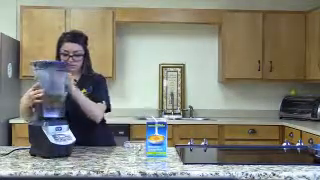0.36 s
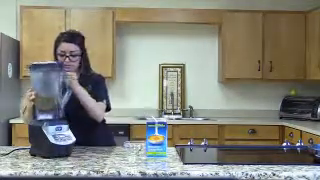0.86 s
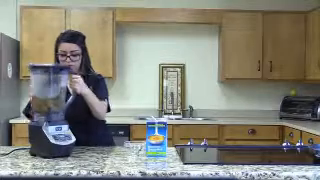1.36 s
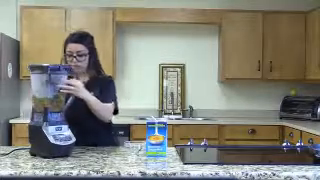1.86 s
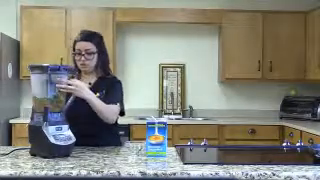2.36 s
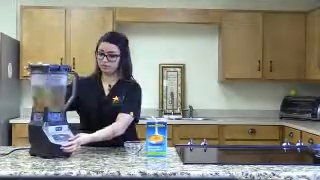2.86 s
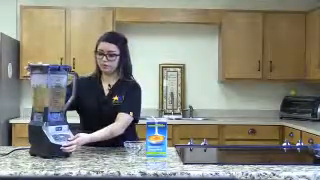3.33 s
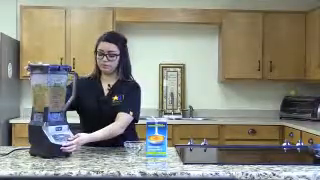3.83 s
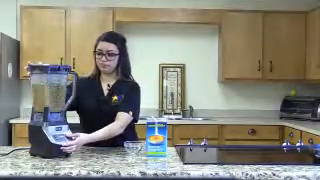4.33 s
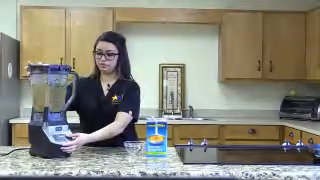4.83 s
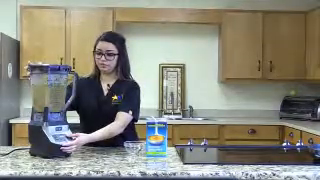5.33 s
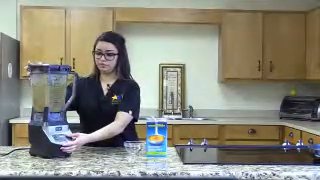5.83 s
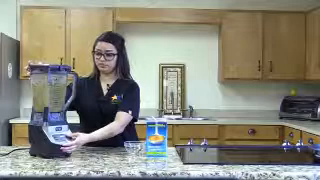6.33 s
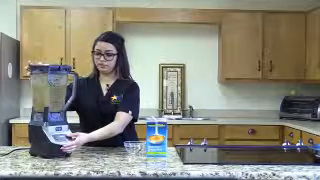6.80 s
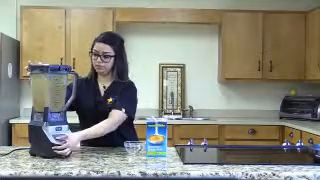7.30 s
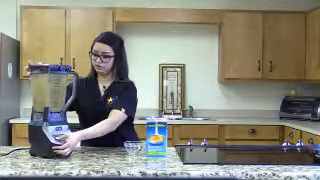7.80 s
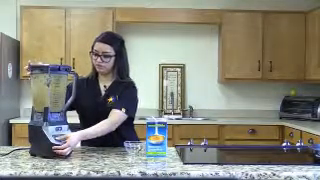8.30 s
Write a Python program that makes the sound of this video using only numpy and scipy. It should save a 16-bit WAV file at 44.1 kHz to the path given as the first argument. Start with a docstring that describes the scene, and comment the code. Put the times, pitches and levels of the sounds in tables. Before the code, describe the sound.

Plastic jar thumps and twists into place, a switch clicks, and a blender roars with a rising whine, briefly cuts out, then winds down.

```python
"""Blender in a quiet kitchen

One microphone, near enough that the room's echo stays well under the direct sound. A blender jar
is knocked, slid and twisted onto its base: damped blows, ringing modes, cracks and friction noise.
A switch clicks and a geared motor spins up, whines over the churning load (tones locked to shaft
speed over shaped noise) and coasts down. The sound drops out twice for a moment, and after the
second gap the motor runs faster."""
import sys
import numpy as np
from scipy import signal
from scipy.fft import rfft, irfft
from scipy.io import wavfile
from scipy.ndimage import uniform_filter1d

SR = 44100
rng = np.random.default_rng(int(sys.argv[2]) if len(sys.argv) > 2 else 0)


def boost(x):
    """Linear amplitude factor 10**(x/20) for a level x in decibels (scalar or array-like)."""
    u = np.asarray(x, float) / 20
    return 10 ** u


def store_wav(level_fs):
    """Save 16-bit WAV to argv[1]."""
    pcm = np.round(np.clip(np.atleast_2d(level_fs), -1, 1) * 32767)
    wavfile.write(sys.argv[1], SR, pcm.T.astype(np.int16))


N = 382193

# Steady air and rumble of the room: pitch_hz, relative level_db per Hz
FLOOR = [(20, -26), (40, -11), (65, -0.5), (85, -9.5), (105, -15), (150, -8.5), (190, -20), (700, -25.5),
         (1000, -30.5), (5000, -40.5), (16000, -47)]
# Faint low hum: time_s, pitch_hz, relative level_db
HUM = [(0, 135, -61), (.28, 139.6, -57), (.36, 142, -72.5), (2.55, 152, -79)]
# Echo of the kitchen: pitch_hz, t60_s
KITCHEN = [(120, 0.45), (400, 0.42), (1000, 0.5), (2300, 0.55), (6060, 0.36)]
# Hands and jar sliding: start_s, bend_s, end_s, start_db, bend_db
RUBS = [(0.332, 0.73, .93, -74, -57.5), (1.847, 1.87, 2.2, -66, -67), (2.181, 2.298, 2.42, -68, -67)]
# Modes of jar and base: pitch_hz, relative level_db, t60_s
JAR_MODES = [(250, -10.5, 0.037), (341, -3, 0.067), (500, 2, 0.037), (692, -5.5, .06), (800, -21.5, .06),
             (990, -9.5, 0.077), (1150, -13, .05), (1600, -17.5, .04), (2080, -21, .05), (2780, -29, .04)]
# Parts of blows on jar, lid and switch; a hard blow takes several rows, including a reflection:
# start_s, blow_db, blow pitch_hz, relative crack_db, relative thud_db
KNOCKS = [ (0.312, -47, 221, -72, -56), (.312, -48, 1280, -63, -70), (.878, -36.5, 277, -86, -43),
          (.878, -44, 1630, -83, -74), (0.964, -53, 2400, -66, -60), (1.015, -41, 345, -63.5, -46),
          (1.042, -22.5, 298, -42, -35), (1.135, -50, 1710, -73, -59), (1.163, -29, 730, -67.5, -39),
          (1.272, -28.5, 646, -64, -41), (1.292, -36, 1370, -69.5, -56.5), (1.311, -18, 344, -64, -58),
          (1.3197, -12, 910, -24.5, -50), (1.323, -5, 476, -44, -25), (1.3233, -14, 257, -61.5, -60.5),
          (1.3273, -18, 501, -52, -50), (1.39, -31, 480, -70, -60), (1.409, -31, 384, -70, -62),
          (1.583, -32, 317, -49.5, -57), (1.598, -23, 756, -56.5, -48.5), (1.611, -49, 1600, -38.5, -57),
          (1.615, -27.5, 800, -59, -70), (1.663, -56, 2560, -58, -73), (1.698, -34, 303, -73, -56),
          (1.71, -33, 1870, -24.5, -59), (1.731, -31, 1190, -38, -70), (1.7357, -17.5, 440, -56, -45),
          (2.48, -46.5, 598, -62, -63), (2.6, -30.5, 840, -47, -71), (2.649, -40, 470, -42, -74),
          (2.7062, -9.5, 1360, -25, -54), (2.710, -11, 454, -31, -52)]
# Spectrum of a crack: pitch_hz, relative level_db per Hz
CRACK = [(300, -13), (1200, 3), (2000, 5), (3000, 0), (4800, -10), (5800, 0), (6800, -6.5), (8500, -11),
         (11000, -15.5), (16000, -23)]
# Blade shaft, climbing as the mix thins and coasting at the end: time_s, speed in turns a second
SPEED = [(2.707, 12), (2.8, 25.5), (2.9, 31.8), (3.0, 37.5), (3.1, 40.7), (3.2, 42.1), (3.32, 43.2),
         (3.55, 44.8), (3.8, 45.9), (4.83, 48.2), (5.01, 48.8), (6.31, 51.9), (6.69, 52.5), (7.13, 52.7),
         (7.19, 59), (7.49, 59), (7.8, 42.9), (7.95, 36.5), (8.1, 30.8), (8.38, 20.8), (8.67, 11)]
# Winding hum while the starting current is high: pitch_hz, starting level_db, t60_s
STARTING_HUM = [(120.7, -36, 0.5), (238.5, -25.5, 0.81)]
# Spectrum of the motor and load noise: pitch_hz, relative level_db per Hz
ROAR = [(15, -52), (25, -41), (102, -11), (134, -18), (195, -5), (249, -5), (394, -3.5), (476, -3),
        (591, -3.5), (734, -3.5), (1840, -12), (2550, -14), (4370, -21.5), (9840, -34.5), (16000, -38)]
# Housing resonances in that noise: pitch_hz, width_hz at half the lift, lift_db
HOUSING = [(480, 22, 10.5), (804, 133, 3), (2390, 960, 7.5), (2650, 230, 1.5), (5760, 240, 4),
           (6840, 680, 4), (9790, 1350, 10), (12150, 610, 4.5)]
# Pitch of each motor tone: multiple of shaft speed
MULTIPLES = [1, 2, 3, 4, 5, 6, 7, 9, 10, 48, 52, 96, 108, 111, 162, 192, 52]
# Change of each motor tone once the power is off: change_db
COASTING_DB = [0, 0, 3, 0, 3, 6, 0, 0, 0, 0, 1, -30, -20, -20, -20, -15, -25]
# Each tone through the housing: relative level_db, best radiated pitch_hz, width_hz (12 dB down)
ORDERS_HEARD = [ (-45, 56.8, 9.2), (-57, 99, 76), (-32.5, 174, 41), (-32, 196, 58), (-17.5, 424, 101),
                (-38, 225, 97), (-39, 336, 48), (-32.5, 489, 72), (-31.5, 485.5, 29), (-36, 2600, 450),
                (-26.5, 3200, 1160), (-39, 2780, 220), (-48, 4690, 360), (-48, 5900, 730),
                (-51.5, 8040, 560), (-48, 10000, 650), (-31.5, 1386, 64)]
# Commutator whistles, exposed as the roar dies: multiple of shaft speed, relative running_db, coasting_db
WHISTLES = [(240, -67, -74), (288, -56.5, -53.5), (384, -80, -58), (480, -90, -66), (576, -90, -74)]
# How strongly whistles carry at each pitch: pitch_hz, gain_db
WHISTLE_RANGE = [(6500, -25), (7800, -1), (8800, 1), (9500, -4), (10200, -1), (11200, -6), (12400, 0),
                 (13500, -4), (15500, -3), (20000, -12)]
# Spectrum of food ticks: pitch_hz, relative level_db per Hz
CHUNK = [(1000, -10), (2500, -3), (5000, -2), (6800, -4), (7800, 0), (8800, -12), (16000, -26)]
# Spectrum of the coupling's clacks: pitch_hz, relative level_db per Hz
SLACK = [(200, -8), (600, 0), (2000, -9), (5000, -20), (8000, -30), (16000, -55)]
# Dropouts: start_s, end_s, first step down in step_db
GAPS = [(2.542, 2.599, -22), (7.139, 7.198, -27)]

CRUISE = 49  # turns a second at which the motor's noise settings hold


def evened(x):
    """Scales a signal to rms 1."""
    return x / np.sqrt(np.mean(x ** 2) + 1e-20)


def read(points, hz):
    """Reads a table at hz, straight between points on a log frequency axis."""
    f, value = np.transpose(points)
    return np.interp(np.log(hz + 1), np.log(f + 1), value)


def add(mix, s, sound):
    """Lays a sound into the mix at s seconds."""
    part = mix[round(s * SR):][:len(sound)]
    part += sound[:len(part)]


def coloured(x, points):
    """Filters x to a spectrum and evens its level."""
    gain = boost(read(points, np.fft.rfftfreq(len(x), 1 / SR)))
    return evened(irfft(rfft(x) * gain, len(x)))


def drift(rate_hz):
    """Slow random wander of rms 1, with rate_hz new values a second."""
    steps = rng.standard_normal(round(N / SR * 60) + 2)
    at = np.arange(N) / SR * np.clip(rate_hz, 1, 59)
    return evened(np.interp(at, np.arange(len(steps)), steps))


def room_air():
    """Steady air and machine rumble, and a wavering hum."""
    s, hz, db = np.transpose(HUM)
    t = np.arange(N) / SR
    hum_db = np.interp(t, s, db) - 0.5 + 2.5 * drift(9)
    hum = boost(hum_db) * np.sin(2 * np.pi * np.cumsum(np.interp(t, s, hz)) / SR)
    air = coloured(rng.standard_normal(N), FLOOR)
    return boost(-60 + 0.4 * drift(18)) * air + hum


def kitchen(x):
    """Room echo: sparse taps of random sign, each band dying at its own speed."""
    echo_db = -16
    taps = np.zeros(SR // 2)
    at = np.arange(200, len(taps) - 20, 20)
    taps[at + rng.integers(0, 20, len(at))] = rng.choice([-1., 1.], len(at))
    hz, t, z = signal.stft(taps, SR, nperseg=256)
    decay = boost(-60 * t / read(KITCHEN, hz)[:, None])
    tail = signal.istft(z * decay, SR, nperseg=256)[1]
    return boost(echo_db) * signal.fftconvolve(x, tail / np.linalg.norm(tail))[:N]


def rub(start, bend, end, start_db, bend_db):
    """Soft friction noise sounding through the jar's modes, broadened by the grip."""
    tilt_db = 4  # per octave: a rub is brighter than a blow
    t = np.arange(start, end, 1 / SR)
    hz = np.fft.rfftfreq(len(t), 1 / SR)
    body = sum(boost(db + tilt_db * np.log2(f / 500)) / np.hypot(1, (hz - f) / (0.06 * f)) ** 2
               for f, db, _ in JAR_MODES)
    noise = evened(irfft(rfft(rng.standard_normal(len(t))) * body, len(t)))
    # the slide trails off after its bend
    level_db = np.interp(t, [start, bend, end], [start_db, bend_db, bend_db - 6])
    return boost(level_db) * noise * signal.windows.tukey(len(t), .15)


def knock(row, luck):
    """A damped blow, the jar's modes, a crack of noise and a thud through the counter."""
    s, blow_db, blow_hz, crack_db, thud_db = row
    t60 = 0.049 * (500 / blow_hz) ** 0.51  # seconds; higher blows die sooner
    t = np.arange(len(luck)) / SR
    rise = 1 - np.exp(-t / 0.0014)
    blow = np.sin(2 * np.pi * blow_hz * t) * boost(-60 * t / max(t60, .01))
    ring = np.zeros(len(t))
    for hz, db, decay in JAR_MODES:
        # a blow excites the modes near its own pitch most
        mode_db = db - 0.5 - 4.5 * abs(np.log2(hz / blow_hz))
        ring += boost(mode_db - 60 * t / decay) * np.sin(2 * np.pi * hz * t)
    rattle_shape = [(blow_hz / 3, -25), (blow_hz, 0), (blow_hz * 3.04, -10), (blow_hz * 7, -35)]
    rattle = coloured(luck, rattle_shape) * boost(-15.0 - 60 * t / 0.11)
    snap = boost(crack_db + 3.5 - 60 * t / 0.02)
    settling = boost(crack_db - 25.5 - 60 * t / 0.24)  # loose parts
    crack = coloured(luck, CRACK) * (snap + settling)
    scuff = 1 - np.exp(-(t / 0.00082) ** 2)  # the surfaces scuff before they bite
    thud = np.sin(2 * np.pi * 62 * t) * (1 - np.exp(-t / 0.014)) * boost(thud_db + 5.5 - 60 * t / 0.2)
    return rise * boost(blow_db) * (blow + ring + rattle) + scuff * crack + thud


def slack(speed, coasting):
    """The coasting coupling clacks once a turn of the unpowered shaft, at uneven levels."""
    best_speed, width, t60_s = 25, 10, .045  # turns a second (both), s
    turn = np.cumsum(speed) // SR
    size_db = 3 * rng.standard_normal(int(turn[-1]) + 1)[turn.astype(int)]
    level_db = -30 + size_db - 12 * ((speed - best_speed) / width) ** 2
    clacks = (np.diff(turn, prepend=0) > 0) * coasting * boost(level_db)
    dying = signal.lfilter([1], [1, -boost(-60 / (t60_s * SR))], clacks)
    burst = dying * rng.standard_normal(N)
    return coloured(burst, SLACK) * np.std(burst)


def chunks(level_db):
    """Bits of food tick against blade and jar, at unequal levels, about 70 a second."""
    hits = (rng.random(N) < 70 / SR) * boost(3.5 * np.minimum(rng.exponential(1, N), 3))
    dying = signal.lfilter([1], [1, -np.exp(-1 / (0.00092 * SR))], hits)
    tick = rng.standard_normal(N) * dying
    return boost(level_db) * coloured(tick, CHUNK)


def roar(load):
    """Turbulent noise: churning low, rattling gears in the middle, hiss on top, in drifting patches."""
    frames, hz = N // 256 + 5, np.fft.rfftfreq(1024, 1 / SR)[:, None]
    a, b, patches = rng.standard_normal((frames, 513, 3)).T
    patches = evened(uniform_filter1d(uniform_filter1d(patches, 10, 0), 8, 1))
    churn_db, rattle_db, hiss_db = (np.interp(np.arange(frames) * 256, np.arange(N), c) for c in load)
    above_churn = 1 / (1 + (1300 / (hz + 1)) ** 5)
    above_rattle = 1 / (1 + (3600 / (hz + 1)) ** 8)
    shape_db = read(ROAR, hz) + sum(db / (1 + (2 * (hz - f) / w) ** 2) for f, w, db in HOUSING)
    db = shape_db + (above_churn - above_rattle) * rattle_db + above_rattle * hiss_db
    spectra = (a + 1j * b) * boost(db + 0.55 * patches)
    noise = signal.istft(spectra, nperseg=1024, noverlap=768)[1][:N]
    return boost(load[0] + 2.5 + 0.11 * drift(30)) * evened(noise)


def tones(speed, strength_db, coasting):
    """Shaft, blade, gear-mesh and commutator orders, each swelling as it crosses a housing resonance."""
    shake, flutter_db, echo_db = .0008, .9, -1  # share of speed, dB, dB over the echo of knocks
    turns = np.cumsum(speed * (1 + shake * drift(45))) / SR  # the load shakes it: high orders blur most
    out = np.zeros(N)
    for k, coast_db, (db, best_hz, width_hz) in zip(MULTIPLES, COASTING_DB, ORDERS_HEARD):
        off = (k * speed - best_hz) / width_hz
        level_db = db + coast_db * coasting + strength_db - 12 * off ** 2 + flutter_db * drift(20)
        out += boost(level_db) * np.sin(2 * np.pi * k * turns)
    fading_db = 14 * np.log10(speed / speed.max())  # slower brushes whistle softer
    for k, run_db, coast_db in WHISTLES:
        level_db = run_db + (coast_db + fading_db - run_db) * coasting
        level_db = level_db + read(WHISTLE_RANGE, k * speed) + 1.5 * drift(20)
        below_nyquist = k * speed < SR / 2
        out += boost(level_db) * below_nyquist * np.sin(2 * np.pi * k * turns)
    return out + boost(echo_db) * kitchen(out)


def blender():
    """All motor layers, switched on with the last click; their levels follow speed, load and power."""
    switch_off_s = 7.49
    t = np.arange(N) / SR
    speed = np.interp(t, *np.transpose(SPEED))
    since = np.maximum(t - SPEED[0][0], 0)
    coasting = np.clip((t - switch_off_s) / .1, 0, 1)
    doublings = np.log2(speed / CRUISE)
    # faster blades churn louder; the unblended load adds churning at first
    churn_db = -24.5 + 6.5 * doublings + 3.5 * np.exp(-since / 0.57)
    # brightness follows speed, down to a least level
    rattle_db = np.maximum(0.33 * (speed - CRUISE), -14.5)
    hiss_db = np.maximum(0.32 * (speed - CRUISE) - 2 * coasting, -17)
    strength_db = 4 + coasting * 6.5 * np.log2(speed / speed.max())
    # food ticks grow quieter from 4.4 s to 6.4 s, and below cruising speed
    chunks_db = -48 - 3 * np.clip(t - 4.4, 0, 2) + 6 * np.minimum(doublings, 0)
    hum = sum(boost(db - 60 * since / t60) * np.sin(2 * np.pi * hz * t) for hz, db, t60 in STARTING_HUM)
    motor = roar([churn_db, rattle_db, hiss_db]) + tones(speed, strength_db, coasting) + hum
    switched_on = np.clip(since / 0.0034, 0, 1)
    return switched_on * (motor + chunks(chunks_db) + slack(speed, coasting))


def scene():
    """Knocks and sliding with their echo, the motor and the room air."""
    hits = np.zeros(N)
    for row, luck in zip(KNOCKS, rng.standard_normal((len(KNOCKS), 16384))):
        add(hits, row[0], knock(row, luck))
    for row in RUBS:
        add(hits, row[0], rub(*row))
    return (hits + kitchen(hits) + blender() + room_air())[None]


def top_cut(x):
    """Nothing passes above the cut-off."""
    return signal.sosfilt(signal.butter(12, 16470, fs=SR, output="sos"), x)


def record(dry):
    """Each gap steps down at once, holds, sinks further and fades back within 13 ms; then a low-pass."""
    t, gain_db = np.arange(N) / SR, np.zeros(N)
    hold_s, sink_s = 0.0071, .005
    for start, end, step_db in GAPS:
        deep_db = step_db - 58
        at_s = [start, start + 0.00043, start + hold_s, start + hold_s + sink_s,
                end - 0.0075, end - .005, end + 0.0051]
        gain_db += np.interp(t, at_s, [0, step_db, step_db, deep_db, deep_db, step_db - 9, 0])
    low_pass = signal.firwin(511, 15780, window=("kaiser", 9), fs=SR)  # edge in Hz
    mix = signal.oaconvolve(dry * boost(gain_db), low_pass[None], "same")
    return top_cut(mix)


dry = scene()
out = record(dry)
store_wav(out)
```